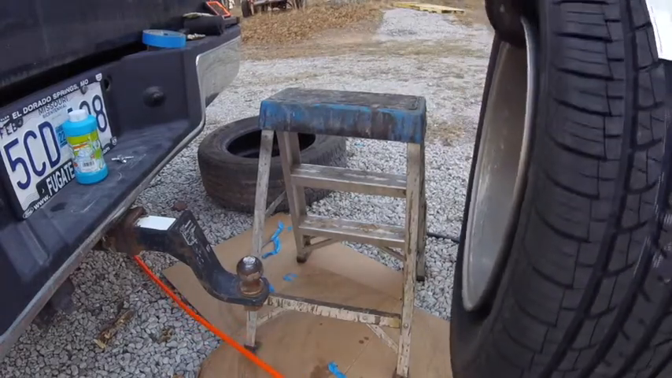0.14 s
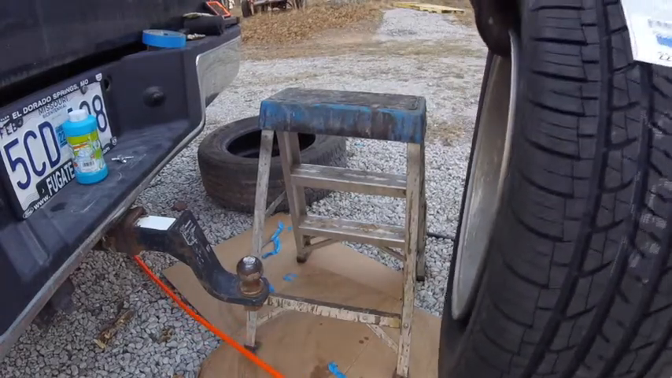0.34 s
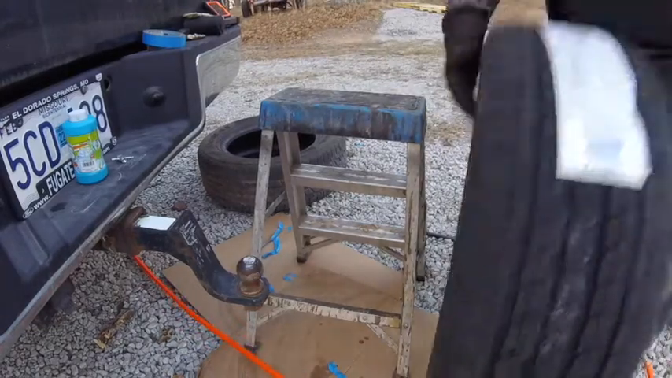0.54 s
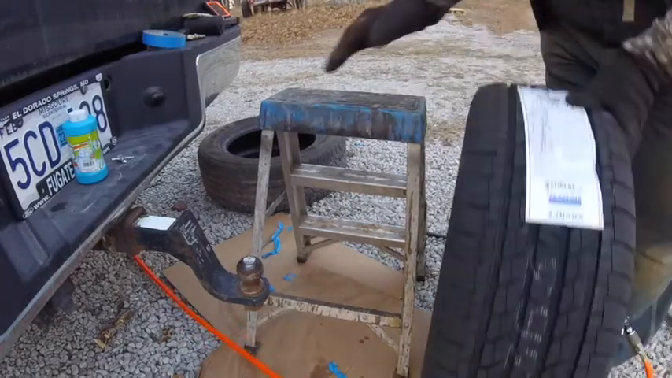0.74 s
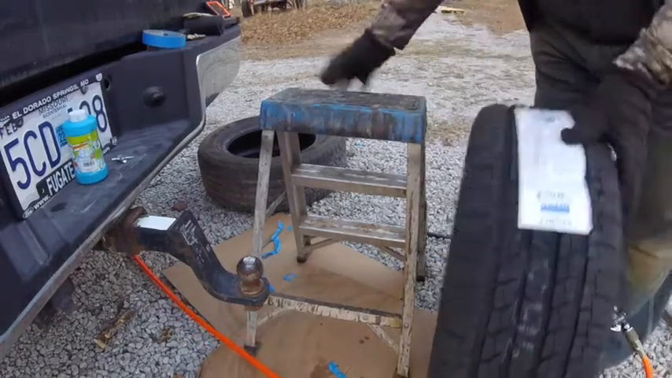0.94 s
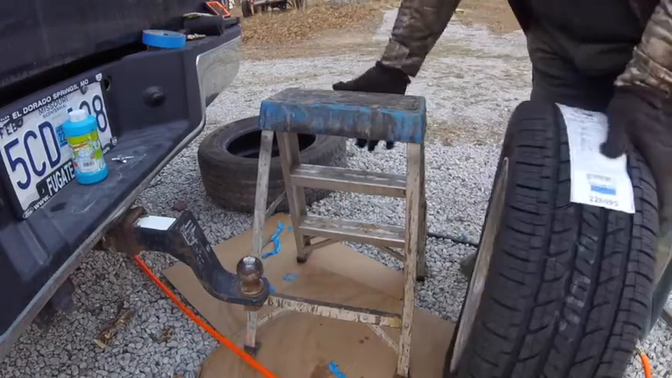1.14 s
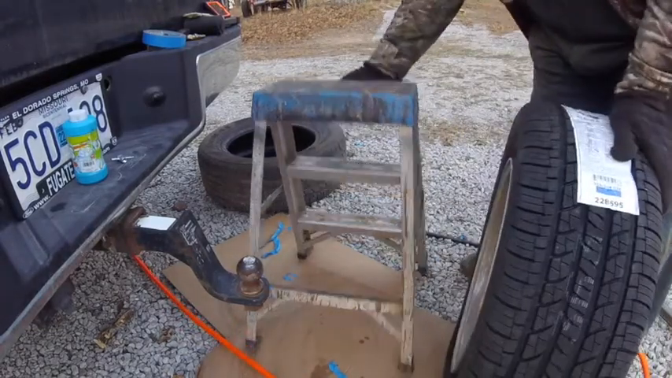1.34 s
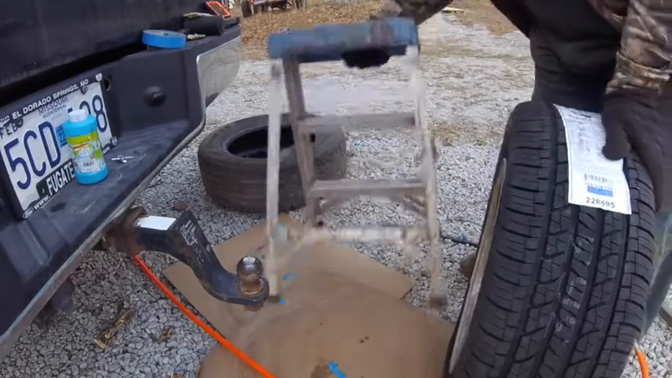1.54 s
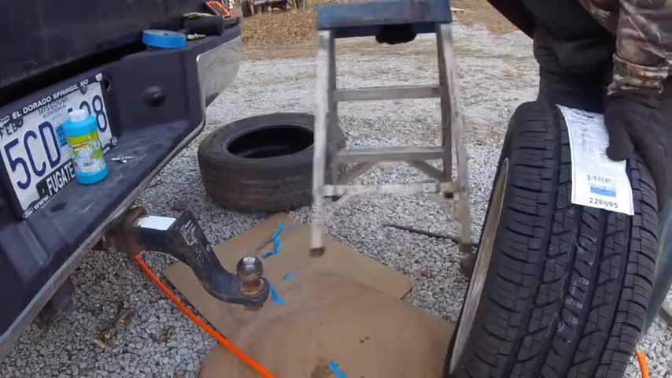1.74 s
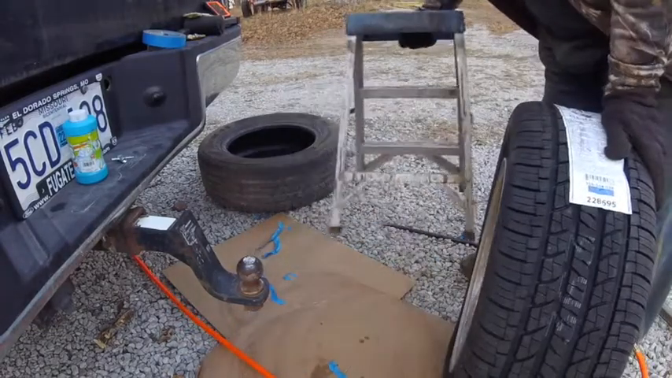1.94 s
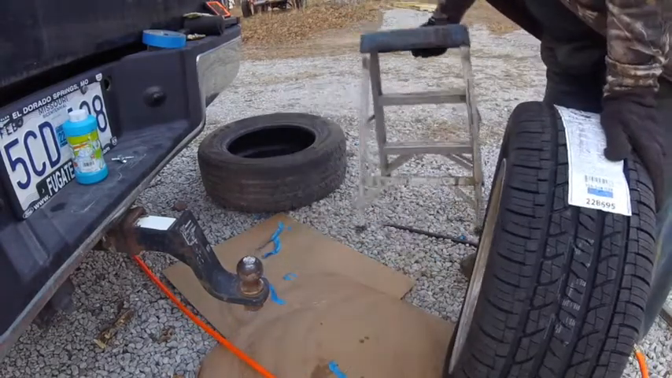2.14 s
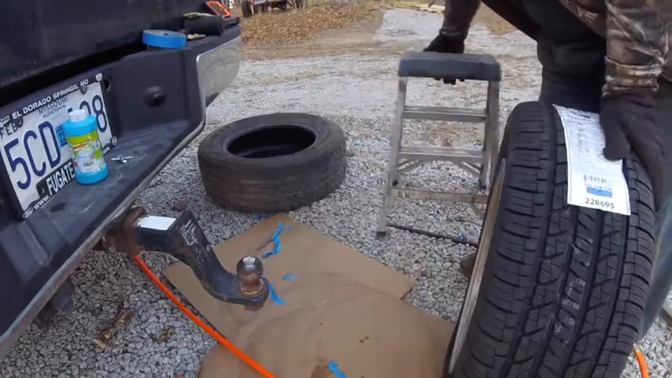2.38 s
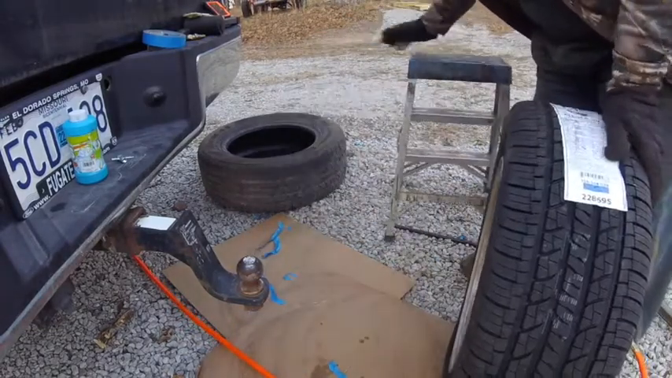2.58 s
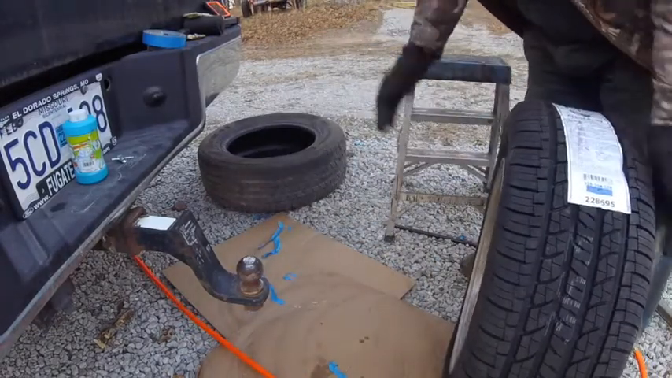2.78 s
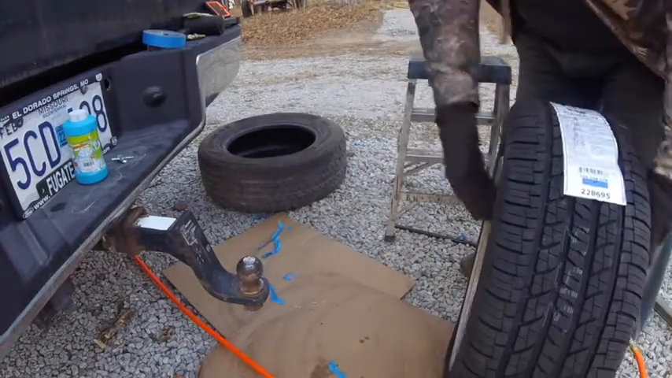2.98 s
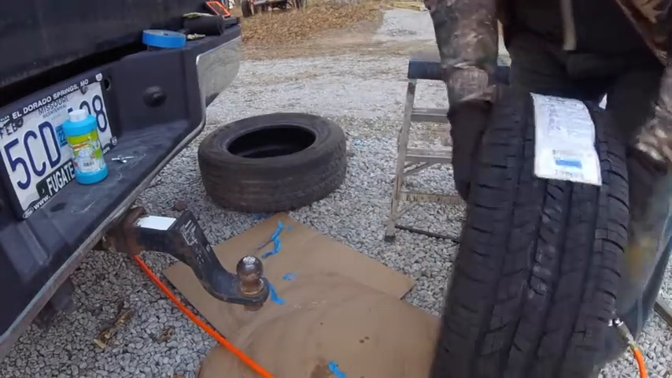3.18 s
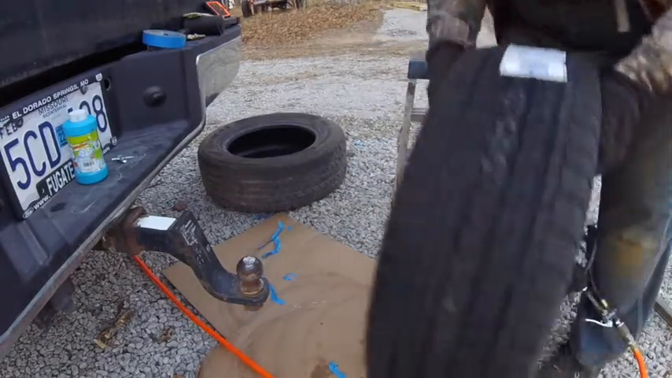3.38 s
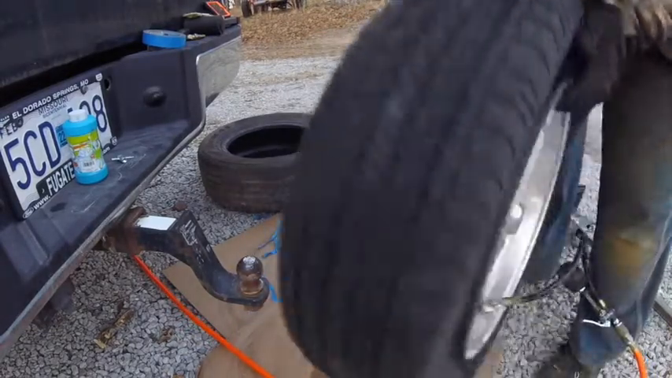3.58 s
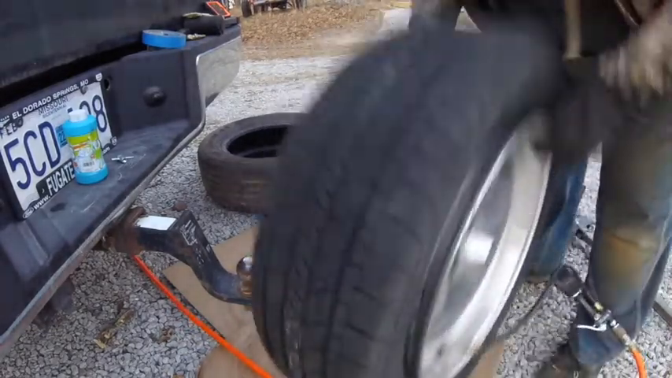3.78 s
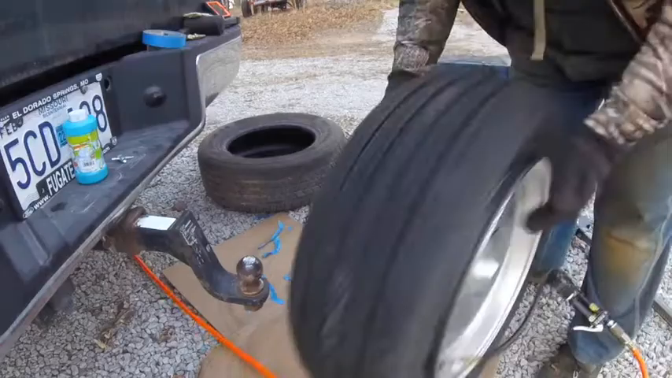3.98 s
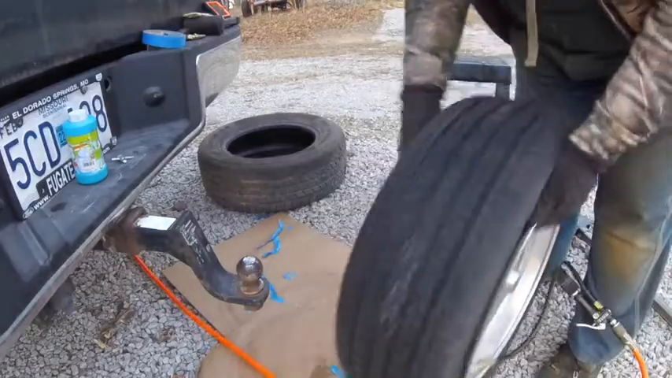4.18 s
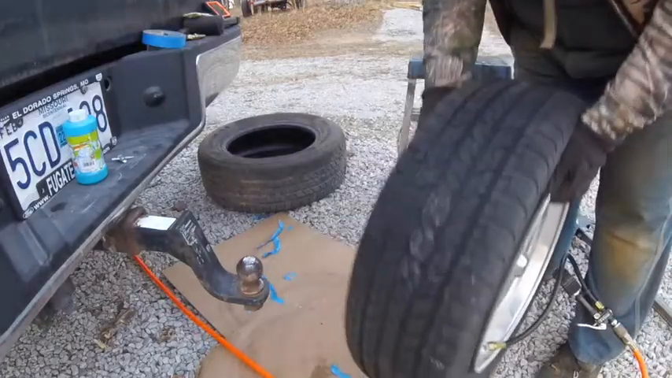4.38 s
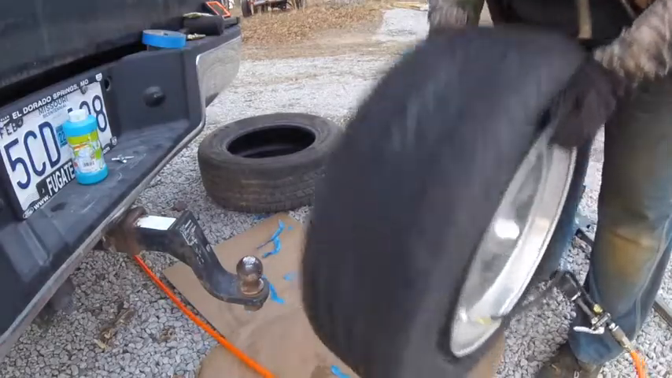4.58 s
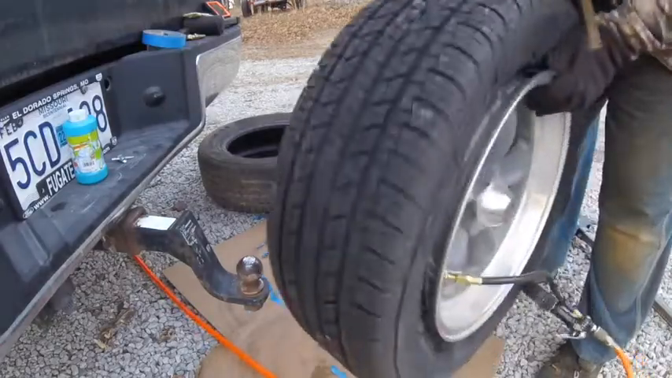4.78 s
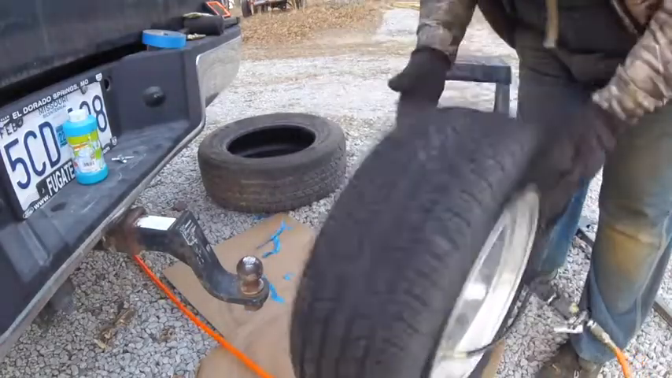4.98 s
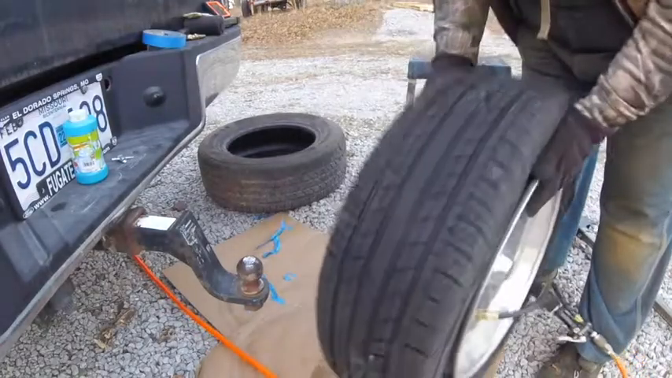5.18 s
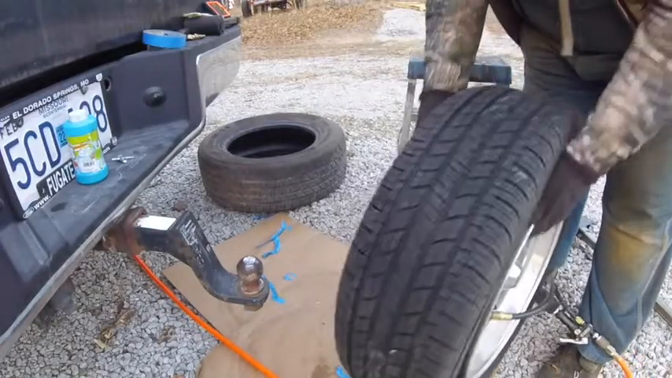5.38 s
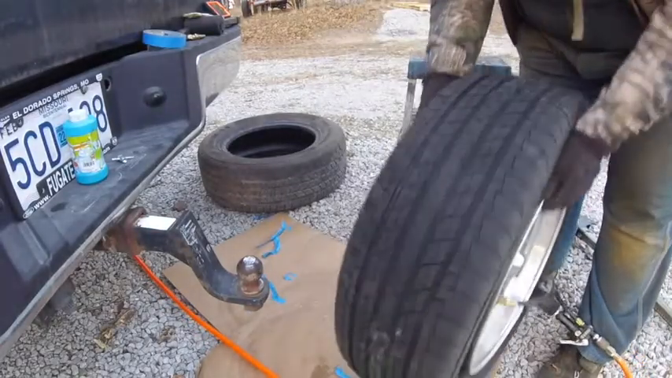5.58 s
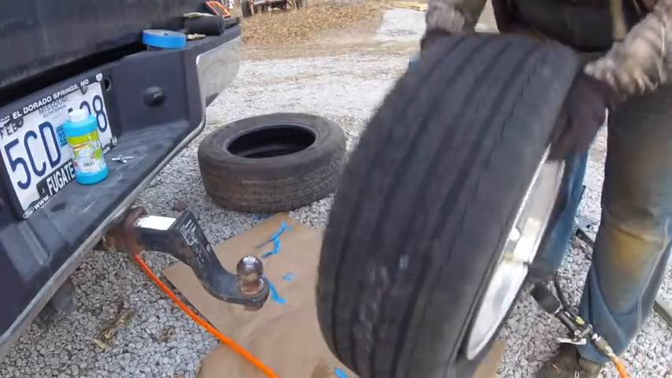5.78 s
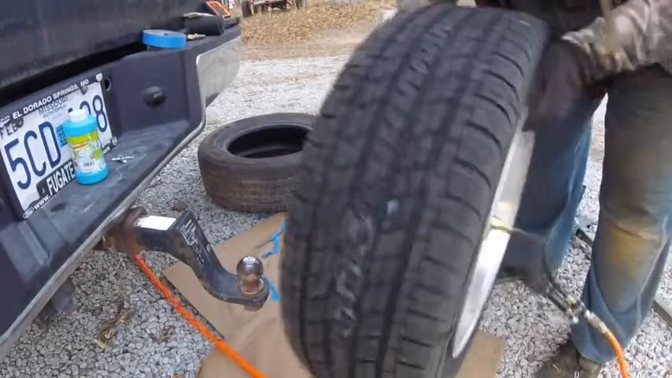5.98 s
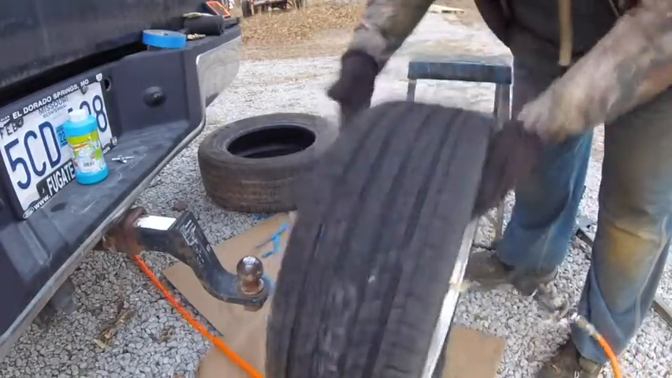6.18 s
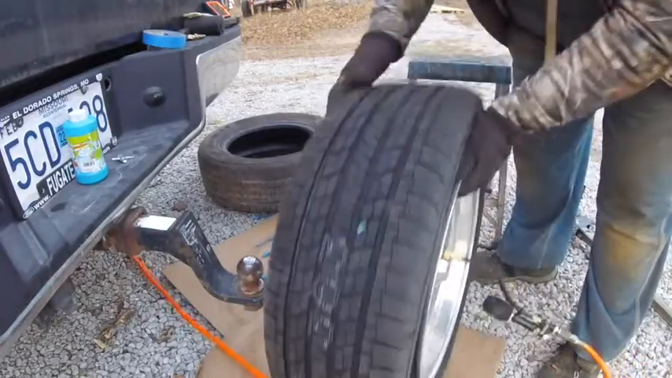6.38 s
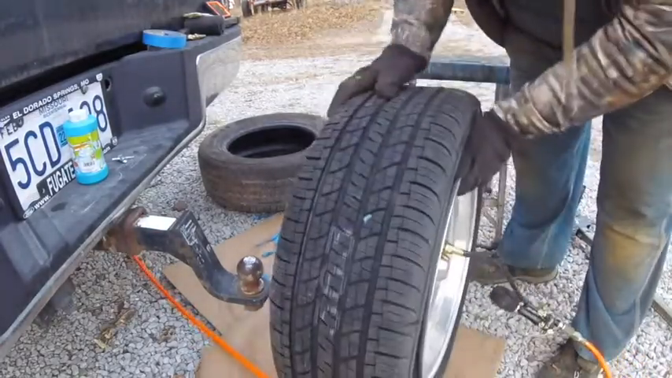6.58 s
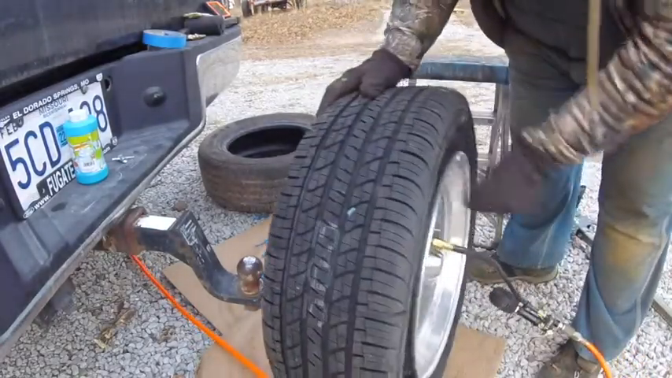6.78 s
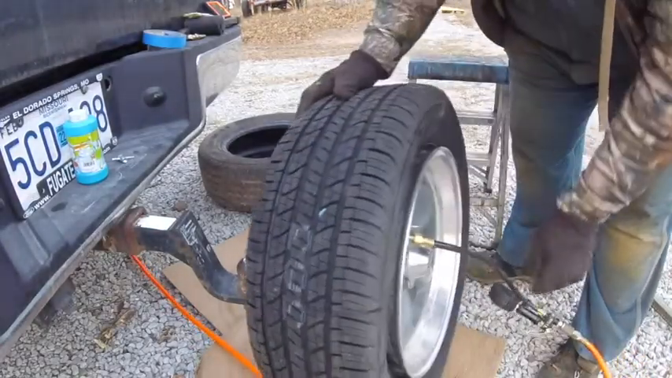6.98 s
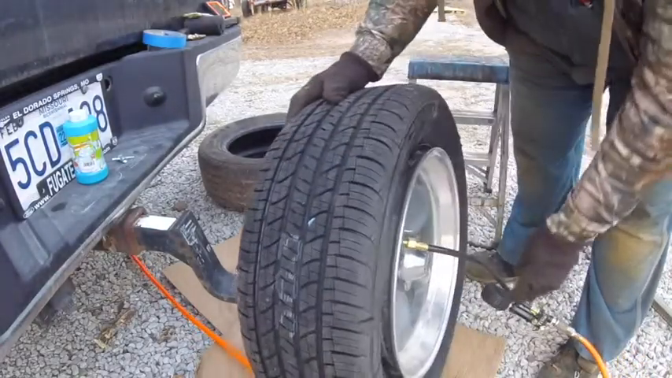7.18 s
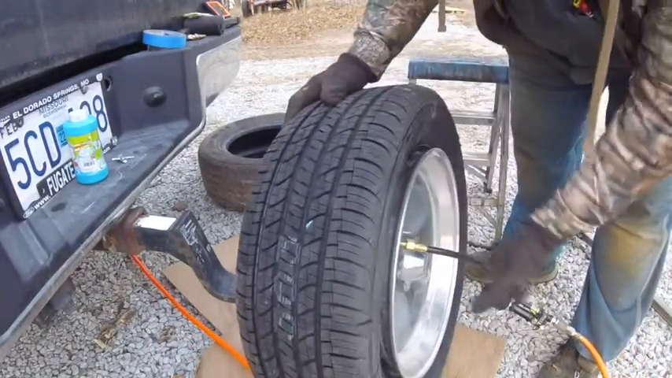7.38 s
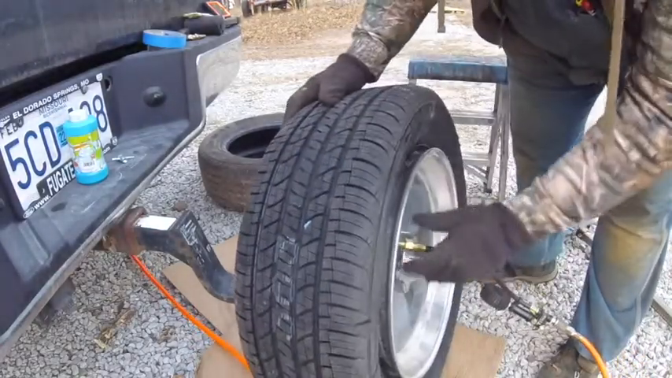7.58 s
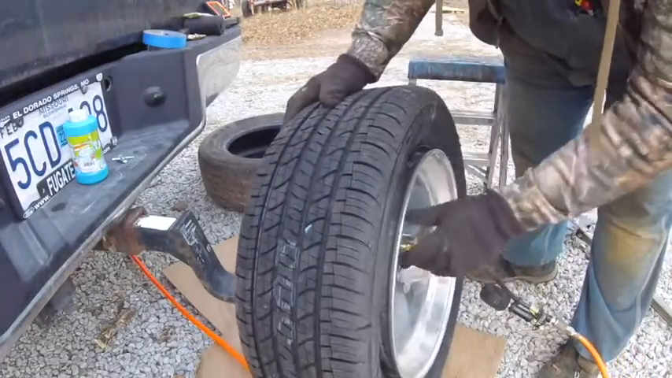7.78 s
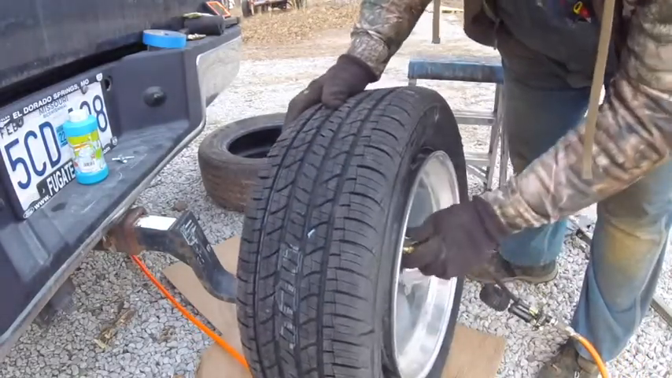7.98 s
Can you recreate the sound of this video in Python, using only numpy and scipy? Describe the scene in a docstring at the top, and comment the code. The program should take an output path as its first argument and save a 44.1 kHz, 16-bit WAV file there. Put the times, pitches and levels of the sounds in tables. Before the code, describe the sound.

In a quiet open yard with faint low drone and hiss, a mounted car tire drops onto cardboard over gravel with a dull slap and small rebounds. A light aluminium step stool then clatters onto stones. Three more drops follow in quick succession, with gloved scuffs, rumbling rubber and a tiny air-fitting clink between the second and third. Pebbles tick after the last. Close microphone, dry, slight echo.

```python
"""Over a faint drone and hiss in a quiet yard, a mounted car tire is handled while pebbles click and sleeves swish.
It drops on cardboard over gravel, then three more times: filtered noise slaps, damped modes ring, gravel crunches.
After the first drop an aluminium step stool clatters, its frame modes ringing over noisy rivets.
Gloved hands grip the rubber with dull noise scuffs, and between the second and third drops
an air-hose fitting clinks and squeaks: scraped noise, short brass modes and a wavering sine."""
import sys
import numpy as np
from scipy import signal
from scipy.fft import rfft, irfft, next_fast_len
from scipy.io import wavfile
from scipy.ndimage import uniform_filter1d, map_coordinates

SR = 44100
rng = np.random.default_rng(int(sys.argv[2]) if len(sys.argv) > 2 else 0)


def to_wav(s):
    """Save 16-bit WAV."""
    ch = np.atleast_2d(s).T  # columns
    pcm = np.round(np.clip(ch, -1, 1) * 32767)  # PCM
    wavfile.write(sys.argv[1], SR, pcm.astype(np.int16))


N = 354431
AGE = np.arange(SR // 2) / SR  # time since a blow [s]


def amp(db):
    """Decibels to gain."""
    return 10 ** (np.asarray(db) / 20)


def unit(x):
    """Scale to rms 1."""
    return x / np.sqrt(np.mean(x ** 2) + 1e-20)


def blow(x):
    """Scale a short sound so that its loudest hundredth of a second has rms 1."""
    return x / np.sqrt(uniform_filter1d(x ** 2, size=SR // 100).max() + 1e-20)


def noise(n=len(AGE)):
    """White noise, as long as one blow unless told otherwise."""
    return rng.standard_normal(n)


def along(points, hz):
    """Read (frequency [Hz], value) points on a log frequency axis."""
    point_hz, values = np.transpose(points)
    return np.interp(np.log(hz + 1), np.log(point_hz), values)


def colour(x, spectrum):
    """Causal, minimum-phase filter with the given (frequency [Hz], level [dB]) shape."""
    m = 2 * next_fast_len(len(x) // 2 + SR // 20)
    level_db = along(spectrum, np.fft.rfftfreq(m, 1 / SR))
    cepstrum = irfft(np.log(amp(level_db)))
    # folding the cepstrum onto positive times makes the response causal
    cepstrum[1:m // 2] *= 2
    cepstrum[m // 2 + 1:] = 0
    response = np.exp(rfft(cepstrum))
    return irfft(rfft(x, m) * response)[:len(x)]


def decay(seconds, t60):
    """Exponential decay that falls 60 dB in t60 seconds."""
    return np.exp(-np.log(1000) * seconds / t60)


def fade(t60, attack):
    """Envelope of one blow: a quick exponential attack [s] and a 60 dB decay time [s]."""
    return decay(AGE, t60) * (1 - np.exp(-AGE / attack))


def wobble(rate):
    """A smooth random curve, rate knots a second."""
    knots = rng.standard_normal(int(N * rate / SR) + 4)
    return map_coordinates(knots, [np.arange(N) * rate / SR])


def grains(n, spread_db):
    """Dense tiny contacts: noise whose size changes every 16 samples, scattered by spread_db."""
    sizes = np.clip(rng.standard_normal(n // 16 + 1), -2, 2)
    return noise(n) * amp(spread_db * np.repeat(sizes, 16)[:n])


def ring(modes, attack, scatter_db, detune):
    """Damped modes, struck at new strengths and slightly new pitches each time."""
    hz, db, t60 = np.transpose(modes)[:, :, None]
    size, shift, phase = rng.standard_normal((3, len(modes), 1))
    waves = np.sin(2 * np.pi * (hz * (1 + detune * shift) * AGE + phase))
    strengths = amp(db + scatter_db * size)
    total = (strengths * decay(AGE, t60) * waves).sum(0)
    return blow(total * (1 - np.exp(-AGE / attack)))


def add(track, s, sound):
    """Mix a sound into the track at time s."""
    part = track[max(round(s * SR), 0):][:len(sound)]
    part += sound[:len(part)]


# low drone spectrum: (frequency [Hz], level [dB])
DRONE = [(15, 2.5), (35, -1.5), (62, 1), (76, -0.5), (89, 6.5), (101, 4), (116, -6), (250, -21.5),
         (400, -54.5)]
# faint hiss spectrum: (frequency [Hz], level [dB])
HISS = [(100, -4.5), (170, 0.5), (330, -2), (600, -8), (1200, -10), (1750, -10.5), (2800, -15.5),
        (4200, -22.5), (6100, -17.5), (6550, -6), (7300, -13), (10500, -23), (12200, -22), (14000, -36)]


def background():
    """A distant low drone that swells gently, and a steady faint hiss: both are filtered noise."""
    swell = amp(1.5 * wobble(5))
    drone = amp(-58) * swell * unit(colour(noise(N), DRONE))
    hiss = amp(-66.5) * unit(colour(noise(N), HISS))
    return drone + hiss


def push(s, length, db, rise, t60):
    """Power over time of one motion: it eases in around s, holds and dies away."""
    t = np.arange(N) / SR - s
    ease_in = np.clip(t / rise + .5, 0, 1)
    let_go = decay(np.maximum(t - length, 0), t60)
    return (amp(db) * ease_in * let_go) ** 2


# wheel or stool rolled, tilted or heaved; levels before trim:
# (start [s], length [s], rumble level [dB], rub level [dB], shifting stones level [dB])
MOVES = [(0.0, 0.21, -53, -58, -67.5), (0.307, 0.73, -59.5, -69, -71.5), (0.952, 0.08, -62, -78, -62.5),
         (1.18, 0.3, -53.5, -70.5, -70), (1.848, 0.03, -46, -56.5, -78), (2.37, 0.068, -63, -47.5, -47),
         (2.512, 0.12, -53.5, -52.5, -55.5), (2.694, 0.43, -56.5, -71, -68),
         (3.146, 0.18, -52.5, -60.5, -68), (3.573, 0.17, -50.5, -59.5, -72), (4.027, 0.052, -46, -53, -64),
         (4.19, 0.31, -54, -63, -64.5), (4.54, 0.21, -50.5, -64, -70), (4.767, 0.18, -45, -57.5, -88),
         (5.06, 0.074, -36, -63, -61), (5.35, 0.15, -51, -60.5, -71.5), (5.797, 0.09, -53, -65, -95),
         (5.91, 0.073, -49, -55.5, -75), (6.013, 0.2, -43, -72, -71.5), (6.284, 0.061, -41, -63, -62),
         (6.397, 0.11, -41, -53.5, -54.5), (6.522, .14, -43.5, -61.5, -72), (7.4, 0.65, -78, -78.5, -85)]
# rocking rubber spectrum: (frequency [Hz], level [dB])
RUMBLE = [(12, -25.5), (28, 2), (55, -2), (105, 2.5), (150, -9), (240, -11.5), (310, -29.5), (700, -97.5)]
# rubbed rubber spectrum, shared with the gloves: (frequency [Hz], level [dB])
RUB = [(120, 0), (240, 2), (310, 1), (420, 9), (660, 1), (1000, -3.5), (1300, -5.5), (1520, -18),
       (3000, -33.5), (8000, -58)]
# grinding stones spectrum, shared with the crunch: (frequency [Hz], level [dB])
GRAVEL = [(300, -21), (1200, -11.5), (2500, 0), (4000, -6), (5400, 2.5), (6600, -2), (7600, -9.5),
          (10000, -20.5), (14000, -60.5)]
MOVE_RISE_S, MOVE_RELEASE_S = 0.023, 0.29  # ease in, t60 of the let-go
# the wheel shudders on after a landing: (level before trim, re that landing's column [dB], t60 [s])
SHUDDER = (-14.5, 1.6)  # rumble, re the deep thump
CREAK = (-19, 0.33)  # rubbing tread, re the carcass
TRICKLE = (-18.5, 0.33)  # settling stones, re the late gravel level
SHUDDER_RISE_S = 0.089


def handling():
    """Moved by hand or shaken by a landing, the tire rumbles, gloves and tread stick and slip, stones shift."""
    power = np.zeros((3, N))  # rumble, rub, stones
    for s, length, *levels in MOVES:
        motion = push(s, length, 0, MOVE_RISE_S, MOVE_RELEASE_S)
        power += amp(levels)[:, None] ** 2 * motion
    for s, *_, late_gravel_db, carcass_db, deep_db in LANDINGS:
        levels = (deep_db, carcass_db, late_gravel_db)
        for layer, db, (share_db, t60) in zip(power, levels, (SHUDDER, CREAK, TRICKLE)):
            layer += push(s + SHUDDER_RISE_S, 0, db + share_db, SHUDDER_RISE_S, t60)
    rocking, rubbing, shifting = np.sqrt(power)
    slip = amp(2.5 * wobble(45))
    settle = amp(1.5 * wobble(70))
    rumble = amp(-3.5) * rocking * unit(colour(noise(N), RUMBLE))
    rub = amp(-2) * rubbing * unit(colour(grains(N, spread_db=3.5) * slip, RUB))
    stones = amp(-5) * shifting * unit(colour(grains(N, spread_db=5.5) * settle, GRAVEL))
    return rumble + rub + stones


# runs of pebble clicks at uneven times, centre values: (start [s], length [s], level before trim [dB], pitch
# [Hz])
SCATTERS = [(0.106, 0.095, -45, 4500), (2.851, 0.47, -48.5, 4200), (6.489, 0.073, -35.5, 1800),
            (6.613, .02, -40.5, 1480)]
SCATTER_DB, SCATTER_OCTAVES = -2, 1  # spread of size and pitch within a run


def scatter(start, length, db, hz, count):
    """A few pebbles tumble at uneven times: rows like those of single pebbles."""
    times = start + length * (np.arange(count) + rng.random(count)) / count
    size, pitch = rng.standard_normal((2, count))
    return list(zip(times, db + SCATTER_DB * size, hz * 2 ** (SCATTER_OCTAVES * pitch)))


# single pebble clicks: (time [s], level before trim [dB], pitch [Hz])
PEBBLES = [(0.0744, -35, 2080), (0.182, -36, 1100), (1.1067, -45, 5740), (1.2177, -30.5, 2120),
           (1.315, -31, 1440), (1.3308, -27.5, 5550), (2.8973, -43, 4340), (3.0127, -42, 5340),
           (3.9923, -34.5, 1490), (4.019, -30, 1200), (4.9392, -43, 1300), (6.4303, -21.5, 1690),
           (6.5311, -27, 2890), (6.548, -29.5, 2730), (6.5627, -37, 2710), (6.5914, -26, 1870),
           (6.605, -29, 1920), (6.73, -48.5, 2520), (6.871, -45.5, 6400), (6.9647, -28.5, 1400),
           (6.9832, -34.5, 1360)]
# dry stone tick spectrum: (frequency [Hz], level [dB])
TICK = [(200, -37), (900, -4), (2200, 4.5), (4100, -1.5), (5500, 2), (6800, -6.5), (9000, -17),
        (14000, -70)]


def pebbles():
    """Stone on stone: a dry noise tick, filtered around the pebble's own pitch."""
    out = np.zeros(N)
    tumbling = [row for run in SCATTERS for row in scatter(*run, count=3)]
    for s, db, hz in PEBBLES + tumbling:
        tick = colour(noise() * fade(t60=0.02, attack=0.00049), TICK)
        pitched = colour(tick, [(hz / 10, -6), (hz / 2, -3), (hz, 0), (hz * 2, -7)])
        add(out, s, amp(db - 17.5) * blow(pitched))
    return out


# sleeve swishes: (time of peak [s], level [dB], half length [s])
SWISHES = [(0.167, -65.5, 0.062), (0.56, -66, 0.032), (2.758, -63, 0.033), (3.278, -68, 0.12),
           (3.778, -59.5, .035), (5.12, -106, .04)]


def sleeves():
    """Jacket cloth brushes in soft swells of bright noise."""
    t = np.arange(N) / SR
    swell = sum(amp(db) * np.exp(-((t - s) / half) ** 2) for s, db, half in SWISHES)
    cloth = [(500, -13.5), (2000, -2), (4000, -8), (5800, 0), (7500, -7), (12000, -19)]
    return swell * unit(colour(grains(N, spread_db=0.5), cloth))


# ringing stones, nominal modes: (frequency [Hz], level [dB], t60 [s])
STONES = [(2660, 8, 0.045), (5070, 6, 0.045), (4790, 0, 0.04), (5380, 2, 0.05), (5560, 0, 0.04),
          (5880, 0, 0.02), (6020, 2, 0.045), (6400, 6, 0.04), (6240, 1, .035), (6800, -4, 0.035)]


def crunch(t60, attack):
    """Stones grind together under a sudden load, and ring."""
    grit = blow(colour(grains(len(AGE), spread_db=0.5) * fade(t60, attack), GRAVEL))
    return grit + amp(-9.5) * ring(STONES, attack=0.00166, scatter_db=-3, detune=0.03)


# tread on cardboard spectrum: (frequency [Hz], level [dB])
SLAP = [(40, -13), (160, 4.5), (310, -10), (480, 2), (750, -5.5), (1100, -3), (1900, -13), (3000, -26),
        (4500, -32), (9000, -59.5), (15000, -100)]
# cardboard crack spectrum: (frequency [Hz], level [dB])
CRACK = [(500, -30.5), (1300, -7), (1750, 16), (2100, -3), (2700, -3), (3600, -21.5), (6000, -7.5),
         (12000, -42)]
# sidewall and rim overtones, nominal: (frequency [Hz], level [dB], t60 [s])
RIM = [(414.5, 5, 0.14), (446, -12, 0.1), (507, -5, 0.3), (629, -1, 0.13), (813, -15.5, 0.66),
       (914, -1, 0.068), (1105, -22, .16), (1170, -14, 0.13), (1230, -20.5, 0.091)]
# tread belt modes and the ring of the air cavity, nominal: (frequency [Hz], level [dB], t60 [s])
CARCASS = [(137.4, -1, 0.15), (179, 1, 0.13), (202, -11, 0.035), (238.3, -2, 0.15), (256.7, -9.5, 0.24),
           (318.5, -8, 0.069), (404, -12.5, 0.17)]
# whole wheel bouncing on its air spring, nominal: (frequency [Hz], level [dB], t60 [s])
DEEP = [(28.4, -4.5, 0.39), (46.8, -17, 0.8), (62, -8.5, 0.45), (83.3, -10, 0.24), (102.7, 2, 0.24),
        (114, -6.5, 0.13)]


def contact(slap_db, hz, t60, gravel_db, carcass_db, deep_db):
    """The tread slaps the cardboard, the belt rings, the wheel sinks on its air spring and the gravel gives."""
    pop = -blow(np.sin(2 * np.pi * hz * AGE) * fade(t60=.03, attack=.0001))
    # the first flat contact is one pressure pulse, then block after block lands
    touch = -blow(colour(AGE * fade(t60=.0007, attack=.0001), SLAP))
    tread = blow(colour(grains(len(AGE), spread_db=2.5) * fade(t60, attack=.0003), SLAP))
    rim = ring(RIM, attack=0.0045, scatter_db=3.5, detune=0.011)
    slap = amp(-3) * pop + amp(-16) * touch + tread + amp(-15.5) * rim
    crack = blow(colour(noise() * fade(t60=0.0097, attack=.0003), CRACK))
    belt = ring(CARCASS, attack=0.0025, scatter_db=2, detune=0.043)
    thump = ring(DEEP, attack=0.0043, scatter_db=3, detune=0.038)
    return (amp(slap_db) * slap
            + amp(1.48 * slap_db + 2) * crack  # the crack grows faster than the slap
            + amp(carcass_db) * belt
            + amp(deep_db + 4) * thump
            + amp(gravel_db - 3) * crunch(t60=0.066, attack=0.00045))


# every three rows are a drop and its two rebounds; levels before trim:
# (time [s], slap level [dB], first slap pitch [Hz], first slap t60 [s], gravel level [dB], lag of the late
# shoulder [s], late slap level [dB], late gravel level [dB], carcass level [dB], deep thump level [dB])
LANDINGS = [(0.655, -19, 455, 0.029, -35, .019, -32, -36.5, -31.5, -36),
            (0.904, -41, 388, .15, -48.5, .02, -51, -52, -35.5, -40),
            (1.054, -63, 392, 0.34, -77, .02, -54.5, -71, -52.5, -51),
            (3.8799, -22, 403, 0.13, -31, .025, -26.5, -32.5, -23, -34),
            (4.148, -31, 570, 0.079, -62, 0.0067, -38.5, -40.5, -31, -41.5),
            (4.328, -46, 354, .03, -55, .02, -54.5, -80, -57, -55.5),
            (4.987, -24, 610, 0.017, -35, .0045, -26, -38.5, -24, -34),
            (5.244, -38.5, 580, 0.13, -47.5, .013, -37, -44, -35.5, -39),
            (5.396, -59, 410, 0.066, -60, .02, -58, -77, -38.5, -43.5),
            (6.188, -26, 597, 0.081, -37, .0188, -21, -27.5, -25, -27.5),
            (6.343, -34, 437, 0.02, -55, .012, -43, -54, -39, -49),
            (6.396, -43.5, 410, 0.22, -63, .02, -39.5, -48, -40, -40)]
# the sidewall bottoms out, then the tread peels off again:
# (delay from landing [s], slap level re late slap [dB], slap t60 [s], gravel level re late gravel [dB],
# carcass level re landing [dB], deep thump level re landing [dB])
STAGES = [(.029, -8.5, 0.046, -8, -5.5, 1), (.08, -18, 0.14, -16, -17.5, -2.5)]
STAGE_PITCH = 0.83  # the loaded tread slaps lower than the first touch
# each shoulder's share of the landing
FIRST_CARCASS_DB, FIRST_DEEP_DB, LATE_CARCASS_DB, LATE_DEEP_DB = 0.5, -7, -5, -9


def tire():
    """Every landing runs the same course: one shoulder, the other, bottoming out, peeling off."""
    out = np.zeros(N)
    for s, slap_db, hz, t60, gravel_db, lag, late_db, late_gravel_db, carcass_db, deep_db in LANDINGS:
        loaded_hz = STAGE_PITCH * hz
        add(out, s, contact(slap_db, hz, t60, gravel_db,
                            carcass_db + FIRST_CARCASS_DB, deep_db + FIRST_DEEP_DB))
        add(out, s + lag, contact(late_db, loaded_hz, 0.067, late_gravel_db,
                                  carcass_db + LATE_CARCASS_DB, deep_db + LATE_DEEP_DB))
        for delay, slap, stage_t60, gravel, carcass, deep in STAGES:
            add(out, s + delay, contact(late_db + slap, loaded_hz, stage_t60, late_gravel_db + gravel,
                                        carcass_db + carcass, deep_db + deep))
    return out


# stool frame, nominal modes: (frequency [Hz], level [dB], t60 [s])
FRAME = [(148.6, -15, 0.071), (383, -5.5, 0.088), (414.6, -4, 0.11), (598, -11.5, 0.13), (744, -13.5, 0.19),
         (900, -5.5, 0.14), (1010, -20.5, 0.17), (1152, -6, 0.09), (1276, -3, 0.11), (1388, -7, 0.043),
         (1480, -12, 0.078), (1660, -32, 0.11), (2203, -8.5, 0.12), (2320, -15, 0.081),
         (2760, -17.5, 0.059), (3130, -31, 0.11), (4200, -11.5, 0.045)]


def knock(db, gravel_db):
    """A leg rings the light frame, shakes its loose rivets and digs into the stones."""
    rattle = [(90, -23.5), (200, 11), (400, 3.5), (1400, 17), (3000, 5.5), (8000, -25.5), (14000, -57)]
    rivets = blow(colour(grains(len(AGE), spread_db=2) * fade(t60=0.082, attack=0.00034), rattle))
    # the joints shift, so the pitches wander from knock to knock
    frame = ring(FRAME, attack=0.0038, scatter_db=5.5, detune=0.029)
    stones = crunch(t60=0.026, attack=0.02)
    return amp(db - 20) * frame + amp(db - 16.5) * rivets + amp(gravel_db - 6) * stones


# stool legs and braces knock; levels before trim: (time [s], level [dB], gravel level [dB])
STOOL = [(1.359, -34, -39), (1.37, -42, -37.5), (1.382, -43, -48), (1.396, -60, -51), (1.857, -29, -44),
         (2.295, -21, -24.5), (2.305, -13.5, -17.5), (2.311, -21.5, -36), (2.323, -11, -21),
         (2.404, -26, -37), (2.418, -10.5, -29), (2.454, -24, -42), (2.504, -30, -69), (2.542, -23.5, -37),
         (2.627, -30.5, -48)]
HOP_S, HOP_LOSS_DB = (0.017, .06), 22.5  # shortest and longest flight of a hopping leg, loss on landing


def stool():
    """Each knock of the stool is followed by a small hop of the leg."""
    out = np.zeros(N)
    for s, db, gravel_db in STOOL:
        add(out, s, knock(db, gravel_db))
        flight = np.interp(rng.random(), [0, 1], HOP_S)
        add(out, s + flight, knock(db - HOP_LOSS_DB, gravel_db - HOP_LOSS_DB))
    return out


# gloves grab and shove the rubber; levels before trim:
# (time [s], scuff level [dB], carcass level [dB], scuff t60 [s])
GRIPS = [(1.371, -41.5, -44, 0.071), (3.237, -57, -57, 0.55), (3.298, -45.5, -71, 0.06),
         (3.697, -42.5, -46.5, 0.042), (3.9913, -29.5, -39, 0.035), (4.02, -34, -38, 0.06),
         (4.408, -45, -56, 0.053), (4.529, -53, -50, 0.55), (4.659, -43, -48, 0.19),
         (4.779, -39, -34.5, 0.13), (4.836, -40, -40, 0.093), (4.939, -40.5, -51, 0.021),
         (5.767, -44, -45, 0.11), (5.984, -52, -53, 0.15), (6.027, -46, -45, 0.12)]


def gloves():
    """A padded hand lands on the rubber and skids: a dull scuff over a soft ring of the belt."""
    out = np.zeros(N)
    for s, db, carcass_db, t60 in GRIPS:
        scuff = blow(colour(grains(len(AGE), spread_db=3) * fade(t60, attack=0.0013), RUB))
        belt = ring(CARCASS, attack=0.023, scatter_db=4.5, detune=0.081)
        add(out, s, amp(db - 5.5) * scuff + amp(carcass_db - 2) * belt)
    return out


# hose fitting clinks: (time [s], level before trim [dB])
CLINKS = [(4.793, -50), (4.818, -33), (4.844, -44), (4.862, -52)]
# brass fitting, nominal modes: (frequency [Hz], level [dB], t60 [s])
BRASS = [(2907, -24, 0.067), (3590, -8, 0.029), (5380, 17.5, 0.013), (5940, -10, .03), (7000, -2, .025),
         (7960, -2, 0.023)]


def fitting():
    """The air-hose fitting jiggles in scraped brass clinks and squeaks thinly as the wheel is lifted."""
    out = np.zeros(N)
    metal = [(1500, -13), (3000, 9.5), (4200, 3), (5400, 13), (7600, 2), (9000, -41)]
    for s, db in CLINKS:
        scrape = blow(colour(noise() * fade(t60=0.0078, attack=0.00091), metal))
        brass = ring(BRASS, attack=.003, scatter_db=2, detune=.003)
        add(out, s, amp(db - 14) * (brass + scrape))
    squeak_hz = 2915 * (1 + .025 * wobble(400))
    squeak = np.sin(2 * np.pi * np.cumsum(squeak_hz) / SR)
    grip = np.interp(np.arange(N) / SR, [4.772, 4.78, 4.86, 4.875], [0, 1, 1, 0])
    return out + amp(-65) * grip * squeak


# yard echo: (frequency [Hz], t60 [s])
YARD = [(100, 0.3), (500, 0.33), (2000, 0.25), (6000, .28), (12000, 0.05)]


def yard(x):
    """A weak scattered echo from the truck and the yard: noise that dies away at its own rate in each band."""
    hz, t, bands = signal.stft(noise(SR // 2), SR, nperseg=256)
    t60 = along(YARD, hz)[:, None]
    tail = signal.istft(bands * decay(t, t60), SR, nperseg=256)[1]
    delayed = np.pad(x, (SR // 200, 0))  # 5 ms
    return signal.fftconvolve(delayed, tail / np.linalg.norm(tail))[:N]


def scene():
    """All blows with their echo, over handling noise, sleeves and the background."""
    blows = pebbles() + tire() + stool() + gloves() + fitting()
    echo = amp(-21.5) * yard(blows)
    return (background() + handling() + sleeves() + blows + echo)[None]


TOP_HZ = 14200  # band limit


def record(dry):
    """Rounds off the highest peaks towards a ceiling of -8 dB and keeps nothing above the band limit."""
    rounded = dry / (1 + (dry / amp(-8)) ** 4) ** (1 / 4)
    m = next_fast_len(N + SR // 2)
    keep = np.fft.rfftfreq(m, 1 / SR) < TOP_HZ
    return irfft(rfft(rounded, m) * keep, m)[:, :N]


dry = scene()
out = record(dry)
to_wav(out)
```